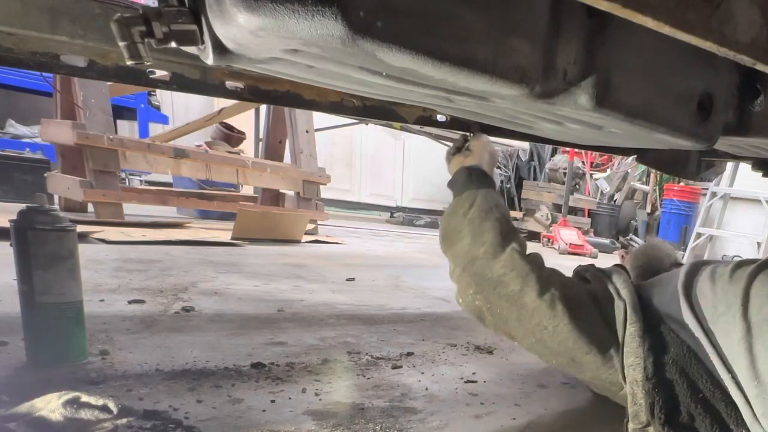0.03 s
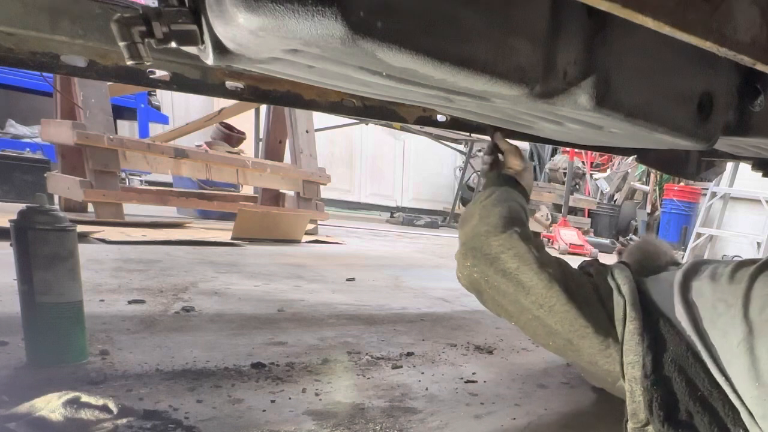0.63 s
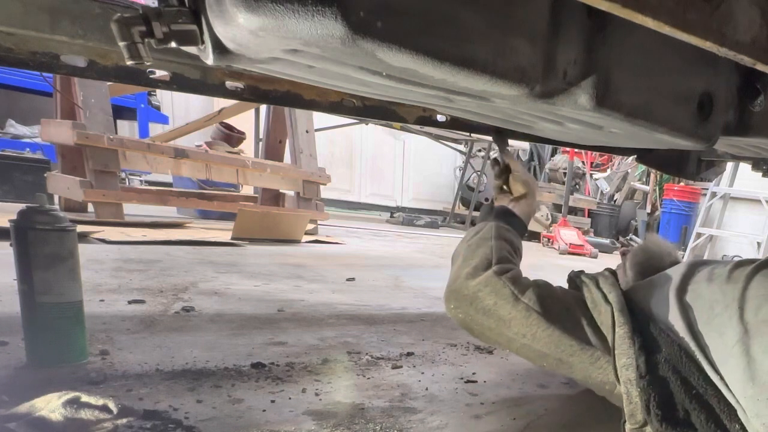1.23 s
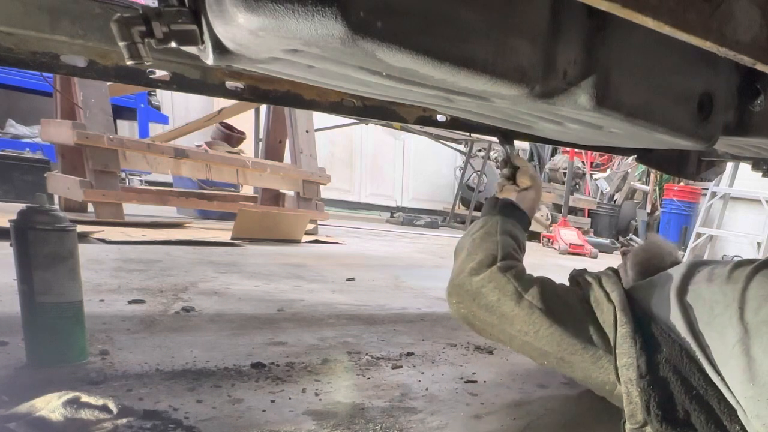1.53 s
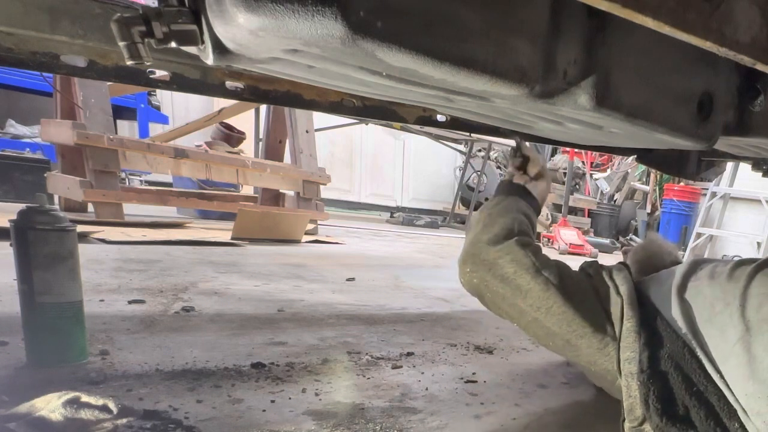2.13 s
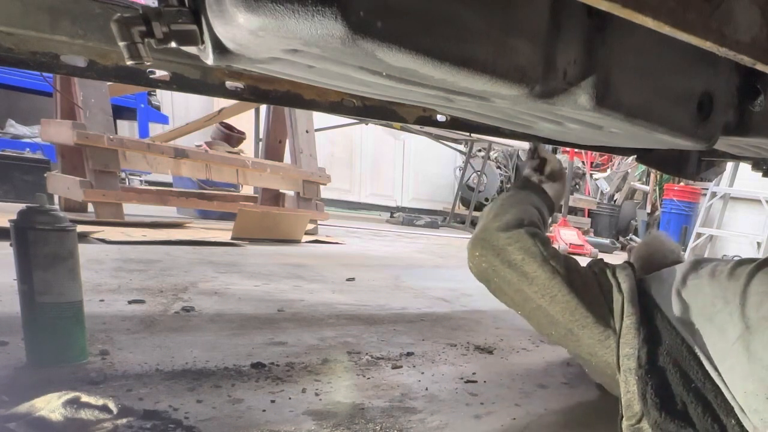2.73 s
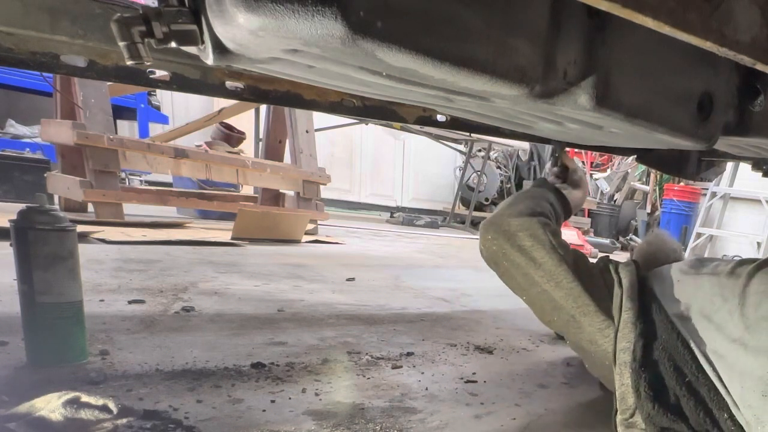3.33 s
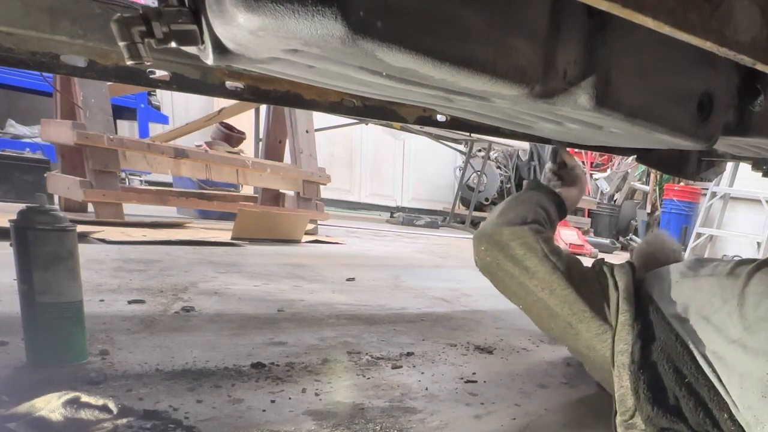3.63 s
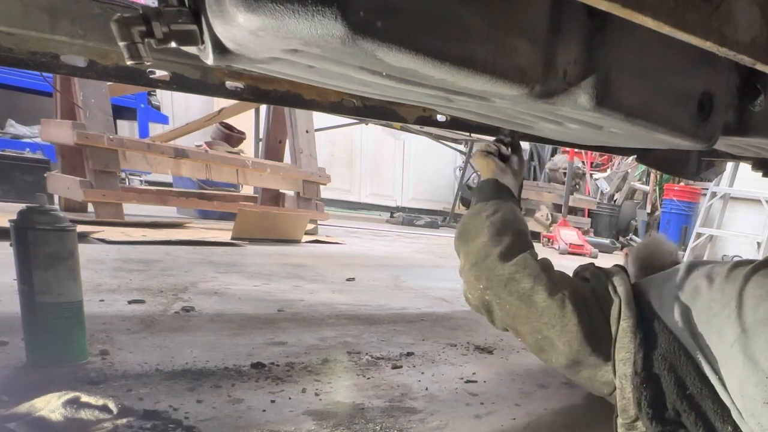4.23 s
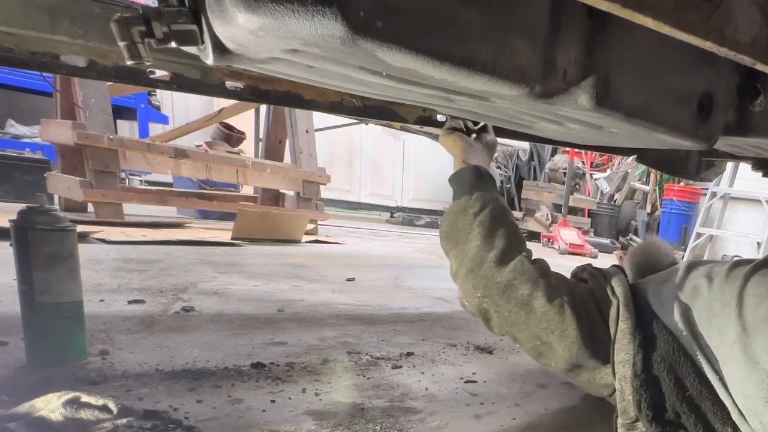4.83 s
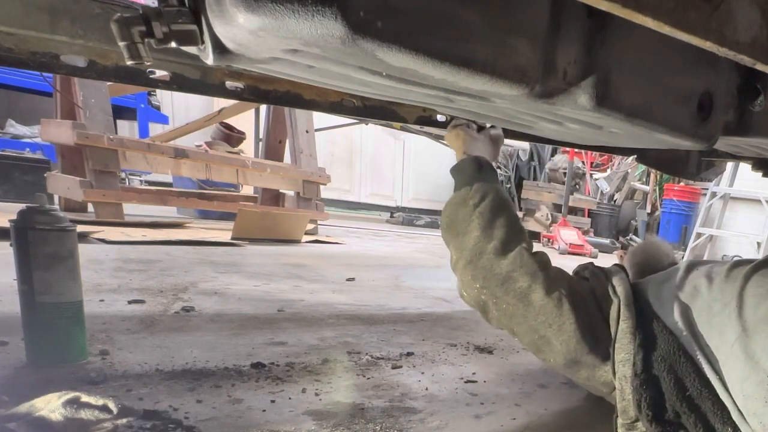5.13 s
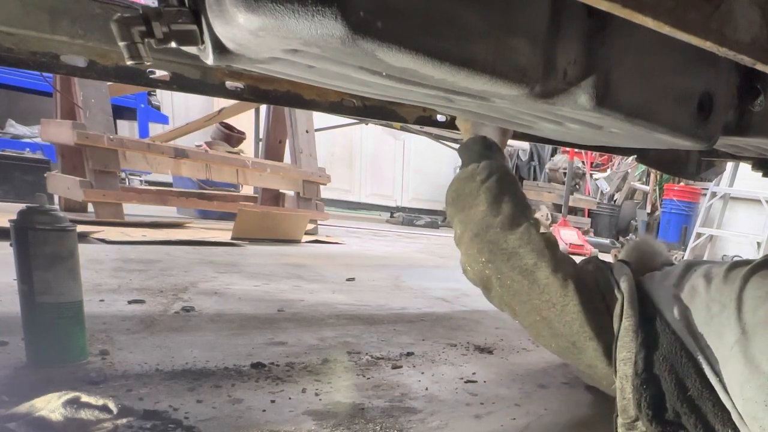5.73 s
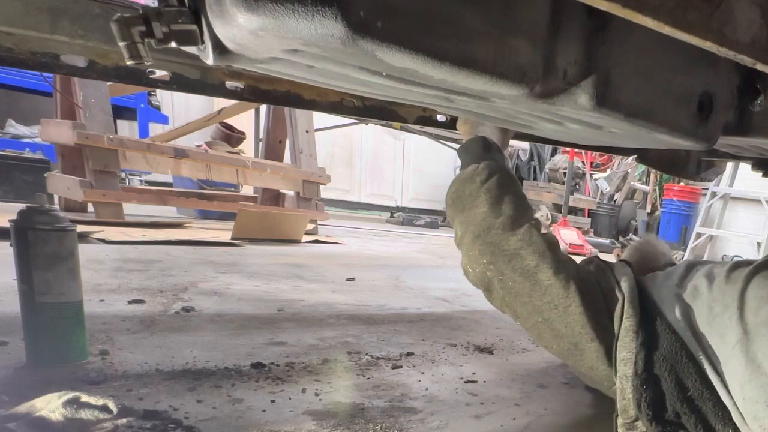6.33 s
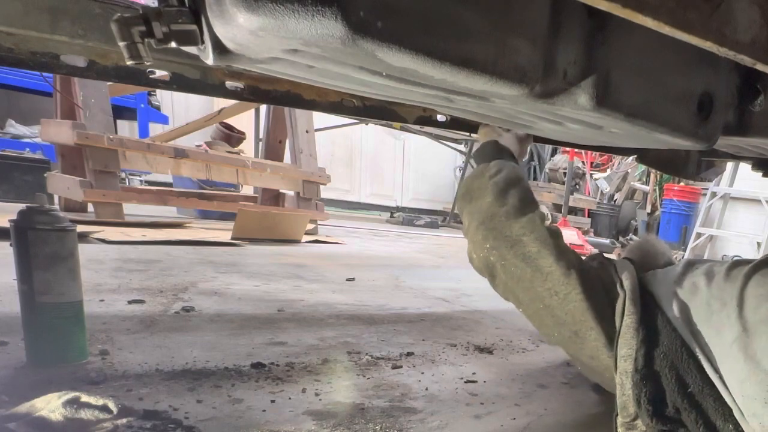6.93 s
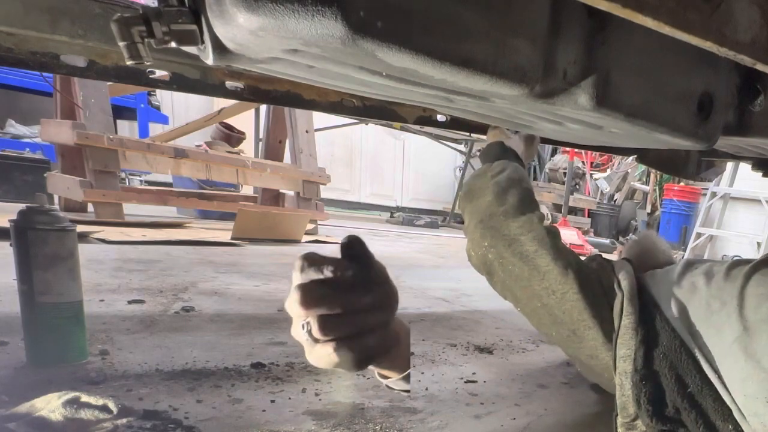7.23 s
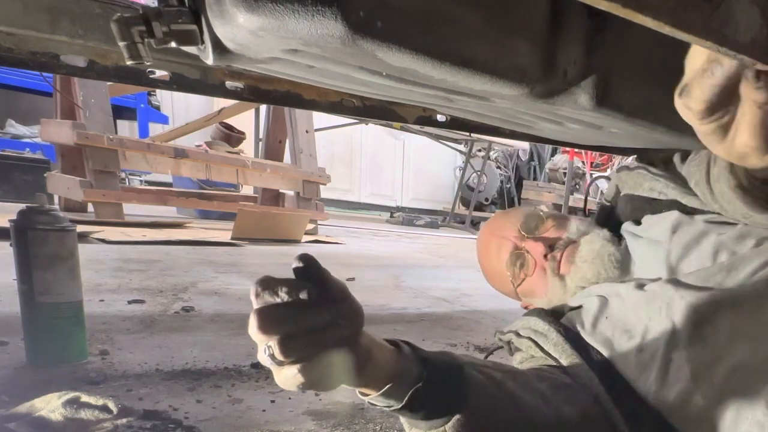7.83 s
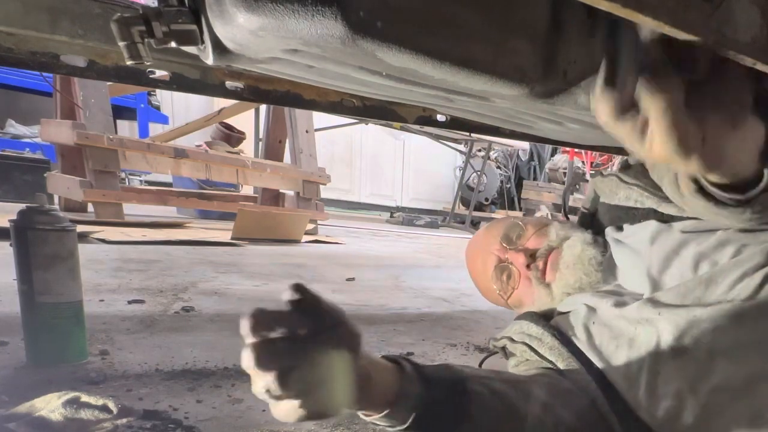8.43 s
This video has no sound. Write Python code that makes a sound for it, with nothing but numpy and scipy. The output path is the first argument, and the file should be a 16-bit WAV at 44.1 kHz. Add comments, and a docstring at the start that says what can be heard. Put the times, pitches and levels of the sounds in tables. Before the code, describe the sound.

Cloth rubs on metal under a vehicle, with gritty ticks, a few hollow knocks and a low workshop hum.

```python
"""Short hissing strokes of a rag scrubbing a steel frame, heard from under a vehicle in a workshop.
The hardest pushes drive the steel against its stop with a hollow knock. Grit ticks under the cloth,
the frame is knocked a few times, then a long wipe close to the microphone sets a panel droning.
The shop adds a short echo; a low hum, a rumble and far traffic lie underneath."""
import sys
import numpy as np
from scipy import signal
from scipy.fft import rfft, irfft, next_fast_len
from scipy.io import wavfile
from scipy.ndimage import uniform_filter1d, map_coordinates

SR = 44100
rng = np.random.default_rng(int(sys.argv[2]) if len(sys.argv) > 2 else 0)


def generate_wav(signal):
    """Clip the signal to [-1, 1] and save it as 16-bit WAV at the path in sys.argv[1]."""
    frames = np.transpose(np.atleast_2d(signal))
    scaled = np.clip(frames, -1, 1) * 32767
    pcm = np.round(scaled).astype(np.int16)
    wavfile.write(sys.argv[1], SR, pcm)


N = 373511

# spectra of the rag's hiss, loose-fibre fizz and coarse scrape: (frequency [Hz], relative level [dB])
CLOTH_SPECTRUM = [(300, -1), (1500, -8.5), (3000, -6.5), (4200, -10.5), (5700, 0.5), (7000, 9), (7700, 0.5),
                  (9700, 11), (11200, -4.5), (15500, -4.5)]
FIZZ_SPECTRUM = [(6000, -1), (10000, -11), (14000, 4)]
SCRAPE_SPECTRUM = [(100, -55), (250, -4.5), (1000, 0), (1900, -6.5), (5000, -10), (9000, -27)]


def amp(db):
    """Decibels to gain."""
    return 10 ** (np.asarray(db) / 20)


def unit(x):
    """Scale to rms 1."""
    return x / np.sqrt(np.mean(x ** 2) + 1e-20)


def along(points, hz):
    """(frequency [Hz], value) points read on a log axis."""
    freqs, values = np.transpose(points)
    return np.interp(np.log(hz + 1), np.log(freqs), values)


def clock():
    """Time of every sample in seconds."""
    return np.arange(N) / SR


def curves(rows):
    """One value per sample for each column after the time."""
    times, *columns = np.transpose(rows)
    return [np.interp(clock(), times, column) for column in columns]


def wobble(rate):
    """A smooth random curve, rate knots a second."""
    return map_coordinates(rng.standard_normal(int(N * rate / SR) + 4), [np.arange(N) * rate / SR])


def filtered(x, response):
    """x shaped by a frequency response."""
    size = next_fast_len(N + SR // 2)
    return irfft(rfft(x, size) * response(np.fft.rfftfreq(size, 1 / SR)), size)[..., :N]


def spread(pair, response):
    """Two unrelated signals become a coloured stereo signal of rms 1."""
    # how alike the two sides of the microphone are: (frequency [Hz], correlation [0-1])
    likeness = [(120, 1), (280, 0.93), (600, 0.25), (4000, 0.51), (8000, 0.15), (12000, 0.86)]
    angle = lambda hz: np.arccos(np.clip(along(likeness, hz), -1, 1)) / 2
    mid, side = filtered(pair, lambda hz: response(hz) * np.array([np.cos(angle(hz)), np.sin(angle(hz))]))
    return unit(np.array([mid + side, mid - side]))


def noise(spectrum):
    """Smooth stereo noise of rms 1."""
    return spread(rng.standard_normal((2, N)), lambda hz: amp(along(spectrum, hz)))


def blow(s, t60):
    """Envelope of a sudden contact at time s."""
    age = clock() - s
    return (age >= 0) * amp(-60 * np.abs(age) / t60)


def motion(strokes):
    """Gain of strokes that speed up and slow down: (time [s], level [dB], rise [s], fall [s])."""
    t, power = clock()[::20], 0
    for s, db, rise, fall in strokes:
        away = np.abs(t - s) / np.where(t < s, rise, fall)
        power = power + amp(db - 20 * away ** 1.5) ** 2
    return np.interp(clock(), t, np.sqrt(power))


def friction(spectrum, grain_db=2, ringing=1):
    """Tiny slips of fibres, coloured by the steel's dense resonances and the rag's shifting folds."""
    slips = rng.standard_normal((2, N)) * amp(grain_db * wobble(2000))
    bands = signal.stft(slips, nperseg=1024)[2]
    folds = uniform_filter1d(rng.standard_normal(bands.shape[1:]), size=9, axis=0)
    folds = uniform_filter1d(folds, size=3, axis=1)
    peaks = rng.standard_normal((bands.shape[1], 1))
    depth = ringing * np.linspace(0, 1, bands.shape[1])[:, None] ** .15
    colour_db = depth * (3.2 * unit(folds) + 3.0 * peaks)
    pair = signal.istft(bands * amp(colour_db), nperseg=1024)[1][:, :N]
    return spread(pair, lambda hz: amp(along(spectrum, hz)))


def catching(depth_db=2.84, per_s=60):
    """Gain of a rag that catches and runs free as it slides."""
    return amp(depth_db * wobble(per_s))


def resonating(modes):
    """Stereo noise ringing through resonances of alternating sign."""
    def response(f):
        return sum((-1) ** k * amp(db) * 1j * f * width / (hz * hz - f * f + 1j * f * width)
                   for k, (hz, width, db) in enumerate(modes))
    return spread(rng.standard_normal((2, N)), response)


def background():
    """Room tone: a wavering hum that swells with an uneven rumble, tyres far away and still air."""
    # swell of the rumble: (time [s], relative level [dB])
    rumble_levels = [(.1, -36), (.35, -47), (.7, -41), (1.3, -49.5), (4.5, -57.5), (5.2, -46.5),
                     (5.85, -44.5), (6.3, -42.5), (6.8, -44.5), (8.3, -48.5)]
    # spectra of the rumble and the air: (frequency [Hz], relative level [dB])
    rumble_spectrum = [(20, -46), (42, -3), (85, -5.5), (107, 7), (153, -3.5), (188, -10.5), (230, -8),
                       (500, -20), (1700, -47.5)]
    air_spectrum = [(200, 0), (500, -17), (1140, -12), (3200, -37), (9000, -42), (12000, -57)]
    # tones of the hum: (frequency [Hz], level [dB])
    hum_tones = [(64, -53.5), (103, -55.5)]
    # tyre noise of far traffic: (time [s], centre [Hz], level [dB])
    traffic = [(0.3, 916, -57), (1.4, 906, -73), (4.2, 1152, -96), (5, 1110, -62), (6.1, 898.7, -56.5),
               (8.4, 814, -61.5)]
    rumble_db, = curves(rumble_levels)
    swell = amp(rumble_db + wobble(12))
    rumble = amp(-4) * swell * noise(rumble_spectrum)
    hum = sum(amp(db + 4 * wobble(11)) * np.sin(2 * np.pi * hz * clock() + wobble(16) / 2)
              for hz, db in hum_tones)
    centre_hz, traffic_db = curves(traffic)
    band = unit(filtered(rng.standard_normal((2, N)), lambda hz: 1 / (1 + (hz / 170) ** 2)))
    carrier = np.cos(2 * np.pi * np.cumsum(centre_hz) / SR)  # slides the band up to its centre
    tyres = amp(traffic_db) * unit(band * carrier)
    return rumble + hum * unit(np.sqrt(swell)) + tyres + amp(-58.5) * noise(air_spectrum)


def workshop_echo(x):
    """The shop's echo, each frequency dying at its own speed."""
    # reverberation of the shop: (frequency [Hz], t60 [s])
    decay_times = [(1000, 0.45), (6000, 0.41), (15000, 0.019)]
    hz, t, bands = signal.stft(rng.standard_normal((2, SR // 2)), SR, nperseg=256)
    tail = signal.istft(bands * amp(-60 * t / along(decay_times, hz)[:, None]), SR, nperseg=256)[1]
    delayed = np.pad(tail, ((0, 0), (200, 0))) / np.linalg.norm(tail[0])
    return signal.fftconvolve(x, delayed, axes=1)[:, :N]


def fine_grit(speed, per_s=110, level_db=-1, scatter_db=3, t60=.009):
    """Small specks snap at random, louder under a faster hand."""
    hits = rng.random(N) < per_s / SR
    specks = hits * amp(level_db + scatter_db * np.clip(rng.standard_normal(N), -2, 2))
    snaps = signal.lfilter([1], [1, -amp(-60 / (t60 * SR))], specks * speed)
    return snaps * noise([(1200, -22), (3000, -8), (9700, 3), (12000, -7)])


def grit_ticks(snap_t60=0.022, rattle_t60=.2, rattle_db=-23):
    """Grit catches and lets go: a bright snap with a brief rattle."""
    # the loudest grit under the cloth: (time [s], relative level [dB], offset of the body [dB])
    ticks = [(0.0742, -28.5, -4.5), (1.71, -18.5, -27), (1.759, -38.5, -5.5), (2.601, -25, -7.5),
             (2.9873, -18, -13), (3.1173, -11.5, -20.5), (3.307, -14.5, -15), (3.5088, -36.5, -2.5),
             (5.1343, -37, -4), (5.371, -51, -4.5), (6.458, -30, -4), (6.6522, -14, -28),
             (6.7078, -9.5, -34), (6.788, -14, -23), (6.994, -9, -30), (7.65, -11, -13.5)]
    top, body = np.zeros(N), np.zeros(N)
    for s, db, body_db in ticks:
        snap = amp(db) * (blow(s, snap_t60) + amp(rattle_db) * blow(s, rattle_t60))
        top += snap
        body += snap * amp(body_db)
    bright = noise([(3000, -71), (8000, -16.5), (12000, -7.5)])
    steel = noise([(500, -18), (2500, -23.5), (7000, 6.5), (12000, 5.5)])
    return amp(-17.5) * top * bright + amp(0.5) * body * steel


def clacks_and_bumps(clack_t60=0.092, ring_t60=0.14, ring_db=-17):
    """Hard contacts clack in dense high modes; soft bumps thud and ring the frame's low ones."""
    # hard and soft contacts with the frame: (time [s], relative level [dB])
    clacks = [(3.533, -29), (3.539, -43), (3.582, -31), (5.944, -26.5)]
    bumps = [(5.102, -49.5), (5.123, -40), (5.206, -49.5)]
    # spectrum of a clack: (frequency [Hz], relative level [dB])
    clack_spectrum = [(1700, -28.5), (2500, -7), (3200, -14), (4400, -11.5), (5400, -9.5), (6800, -1),
                      (7800, -9.5), (12000, -20)]
    # low modes of the frame: (frequency [Hz], relative level [dB], t60 [s])
    frame_modes = [(454, 5, 0.19), (530, -2, 0.044)]
    clack = sum(amp(db) * (blow(s, clack_t60) + amp(ring_db) * blow(s, ring_t60)) for s, db in clacks)
    frame, t = np.zeros(N), np.arange(SR // 2) / SR
    for s, db in bumps:
        ring = sum(amp(level - 60 * t / t60) * np.sin(2 * np.pi * (hz * t + rng.random()))
                   for hz, level, t60 in frame_modes)
        frame[round(s * SR):][:len(t)] += amp(db) * ring * (1 - np.exp(-t / 0.0013))
    thud_gain = sum(amp(db - 13.5) * blow(s, t60=0.74) for s, db in bumps)
    thud = thud_gain * noise([(200, -11), (500, 11), (2000, -19)])
    return clack * friction(clack_spectrum, ringing=0.72) + frame + thud


def hollow_knocks(ring_t60=0.18, tail_t60=.7, tail_db=-21, swell_s=.005, dense_db=-1, fresh_db=-12):
    """Each knock sets off nearly the same hollow ring; bending waves carry its highs ahead of its lows."""
    # a push drives the steel against its stop: (time [s], relative level [dB], extra treble [dB])
    knocks = [(2.071, -41, 4.5), (2.320, -41, 5.5), (2.539, -39.5, 7), (2.723, -42.5, 10),
              (2.908, -45.5, -7), (3.544, -46.5, 13), (3.581, -45, 9)]
    # the frame's dense ring and the modes that stand out of it: (frequency [Hz], relative level [dB])
    dense_spectrum = [(105, -32), (150, 2), (300, -5.5), (900, 4), (1150, -6), (1600, -2.5), (2900, -13),
                      (6000, -30.5)]
    hollow_modes = [(160, -2), (259, 4), (452, 0), (1061, -1), (1098, 0), (1213, -1), (1290, -1)]
    loss_db = 86  # extra damping of a mode, per second and kHz
    travel_s = .004  # time a 1 kHz bending wave takes along the frame
    t, dense = clock()[:SR], noise(dense_spectrum)
    phases = lambda hz: rng.random() + np.array([[.1], [-.1]]) * rng.normal() * min(hz / 1000, 1)
    modes = sum(amp(db - loss_db * t * hz / 1000) * np.sin(2 * np.pi * (hz * t + phases(hz)))
                for hz, db in hollow_modes)
    fading = (1 - np.exp(-t / swell_s)) * (amp(-60 * t / ring_t60) + amp(tail_db - 60 * t / tail_t60))
    shared = unit(modes) + amp(dense_db) * dense[:, :SR]
    highpass = signal.butter(2, 1500, 'high', fs=SR, output='sos')
    out = np.zeros((2, N))
    for s, db, treble_db in knocks:
        at = round(s * SR)
        ring = fading * (shared + amp(fresh_db) * dense[:, at:][:, :SR])
        treble = signal.sosfiltfilt(highpass, ring)
        out[:, at:][:, :SR] += amp(db) * (ring + (amp(treble_db) - 1) * treble)
    dispersed = filtered(out, lambda hz: np.exp(-4j * np.pi * travel_s * np.sqrt(1000 * hz)))
    return dispersed * amp([[.5], [-.5]])


def long_wipe(onset_s=0.19, panel_lag_s=0.0042, ring_db=-3.5, whistle_db=-6):
    """Close to the microphone, cloth hisses and scrapes along a panel that drones and, pressed, whistles."""
    # the hand's effort: (time [s], level [dB])
    effort = [(7.12, -54.5), (7.3, -49), (7.35, -43), (7.41, -48.5), (7.48, -46), (7.6, -46.5),
              (7.68, -42.5), (7.79, -39), (7.99, -51.5), (8.075, -42), (8.106, -46.5), (8.17, -38.5),
              (8.24, -50.5), (8.47, -71.5)]
    # from the panel's ringing middle to a rougher place: (time [s], drone gain [dB], scrape gain [dB])
    contact = [(7.25, 4.5, -4.5), (7.36, 1, -1), (7.55, 3.5, -2.5), (7.97, 3.5, -5.5), (8.075, -2, 6.5),
               (8.165, -3, 0.5), (8.28, 6.5, 3)]
    # panel resonances; the high ones need hard pressure: (frequency [Hz], width [Hz], relative level [dB])
    panel_modes = [(518, 16, -4), (588, 16, 1), (626, 18, -4), (669, 12, 4), (735, 40, -10)]
    whistle_modes = [(2930, 150, 0), (4740, 160, 0)]
    # the two freest modes hold a wavering note: (frequency [Hz], relative level [dB])
    singing_modes = [(588, -7), (669, 0)]
    effort_db, = curves(effort)
    drone_db, scrape_db = curves(contact)
    drag = amp(effort_db) * np.clip((clock() - effort[0][0]) / onset_s + .5, 0, 1)
    pole = np.exp(-1 / (panel_lag_s * SR))  # the panel swells and fades more slowly than the hiss
    shaking = signal.lfilter([1 - pole], [1, -pole], drag * amp(drone_db))
    note = sum(amp(db + 1.2 * wobble(20)) * np.sin(2 * np.pi * hz * clock() + wobble(20) / 2 + [[0], [1]])
               for hz, db in singing_modes)
    ring = amp(ring_db) * resonating(panel_modes)
    whistle = amp(whistle_db) * drag / drag.max() * resonating(whistle_modes)
    drone = shaking * (note + ring + whistle) * amp([[-2.2], [0]])
    scrape = drag * amp(scrape_db) * friction(SCRAPE_SPECTRUM, grain_db=2.5)
    hiss = drag * (friction(CLOTH_SPECTRUM, grain_db=0) + amp(-2.5) * friction(FIZZ_SPECTRUM))
    return drone + catching() * (scrape + hiss) + fine_grit(drag)


def heavy_drags():
    """Where the hand bears down, the rub gains a low, coarse body."""
    # drags of the hand: (time [s], level [dB], half length [s])
    drags = [(0.667, -53, 0.057), (1.638, -45.5, 0.1), (3.219, -47, .03)]
    # their spectrum: (frequency [Hz], relative level [dB])
    drag_spectrum = [(90, -7), (220, -0.5), (480, -8), (800, -8.5), (5000, -23.5)]
    return motion([(s, db, half, half) for s, db, half in drags]) * friction(drag_spectrum)


def hand_speed(quick_gap_s=.3, return_db=-41.5, dab_rise_s=.004, dab_fall_s=0.062,
               slide_db=-14.5, slide_s=0.24, creep_db=-85):
    """Gain of the rubbing: hard pushes, light wipes and sudden dabs, with the rag creeping in between."""
    # hard pushes: (time of top speed [s], level [dB], run-up [s], braking [s])
    pushes = [(1.604, -40, 0.084, 0.045), (2.069, -32.5, 0.038, 0.022), (2.318, -34, 0.071, .03),
              (2.538, -34, 0.044, .028), (2.718, -39, 0.035, 0.044), (2.899, -42, 0.056, 0.044),
              (3.05, -45.5, 0.038, 0.13), (3.204, -40, 0.037, 0.041), (3.541, -35.5, 0.014, 0.027)]
    # light wipes: (time of top speed [s], level [dB], half length [s])
    wipes = [(0.039, -46.5, 0.076), (0.456, -54.5, 0.12), (0.642, -61, 0.073), (1.382, -53.5, 0.023),
             (1.443, -51.5, 0.034), (1.847, -52.5, 0.12), (4.744, -60, 0.084), (5.205, -52, 0.052),
             (6.471, -53.5, 0.075), (6.681, -60, 0.11), (6.803, -48, 0.078), (6.945, -57.5, 0.091),
             (7.082, -49, 0.057)]
    # the rag lands and slides to rest: (time [s], level [dB])
    dabs = [(0.161, -49), (0.866, -50.5), (1.186, -47.5), (1.537, -51), (2.019, -53), (2.952, -40),
            (3.703, -53), (3.932, -50.5), (5.559, -58)]
    strokes = list(pushes)
    push_times = np.array(pushes)[:, 0]
    for s, gap in zip(push_times, np.diff(push_times)):
        if gap < quick_gap_s:  # the hand draws back between quick pushes
            strokes.append((s + 0.52 * gap, return_db, 0.19 * gap, 0.3 * gap))
    strokes += [(s, db, half, half) for s, db, half in wipes]
    for s, db in dabs:
        strokes += [(s, db, dab_rise_s, dab_fall_s), (s, db + slide_db, dab_rise_s, slide_s)]
    return motion(strokes) + amp(creep_db + 3.2 * wobble(7.5))


def scrubbing(speed):
    """Fibres hiss over the steel with the uneven speed of the hand; a coarser scrape lies under them."""
    # a loosely lying rag adds a high fizz: (time [s], level relative to the hiss [dB])
    looseness = [(.55, 1), (.9, -9), (1.25, -9), (1.6, -1), (2.1, -8), (4.0, -6), (4.75, 1), (6.8, 4)]
    uneven = speed * amp(1.3 * wobble(110))
    fizz_db, = curves(looseness)
    hiss = catching() * friction(CLOTH_SPECTRUM)
    fizz = amp(fizz_db) * friction(FIZZ_SPECTRUM)
    scrape = amp(-26) * friction(SCRAPE_SPECTRUM)
    return uneven * (hiss + fizz + scrape) * amp([[.4], [-1.2]])


def scene():
    """The work under the vehicle, its echo and the background."""
    speed = hand_speed()
    rubbing = scrubbing(speed) + fine_grit(speed) + heavy_drags()
    work = rubbing + hollow_knocks() + grit_ticks() + clacks_and_bumps() + long_wipe()
    return work + amp(-10.5) * workshop_echo(work) + background()


def record(dry):
    """The microphone chain sheds the deepest bass and keeps nothing above its band limit."""
    low_cut_hz, top_hz = 28, 16000
    return filtered(dry, lambda hz: (hz < top_hz) * hz ** 4 / (hz ** 4 + low_cut_hz ** 4))


dry = scene()
out = record(dry)
generate_wav(out)
```